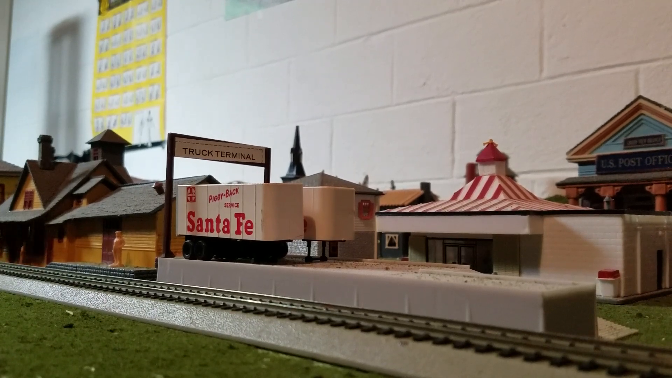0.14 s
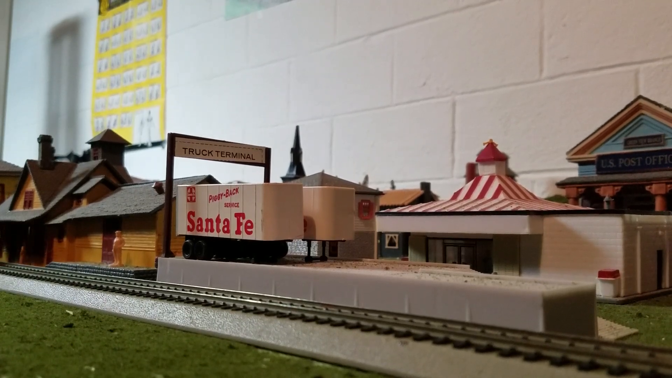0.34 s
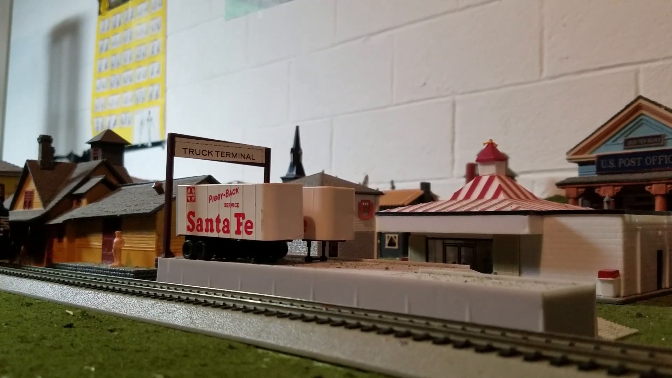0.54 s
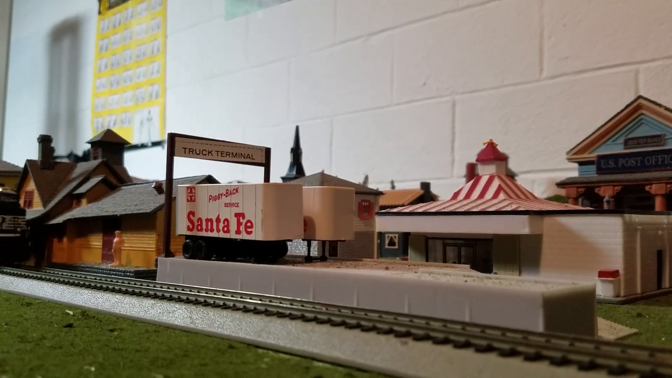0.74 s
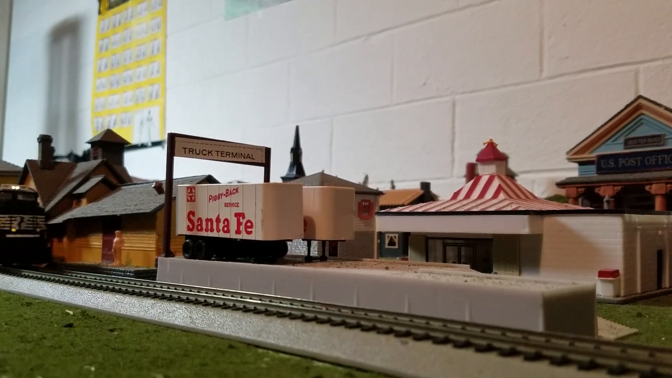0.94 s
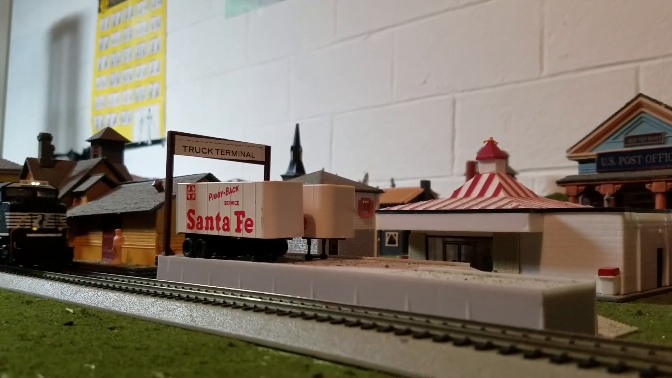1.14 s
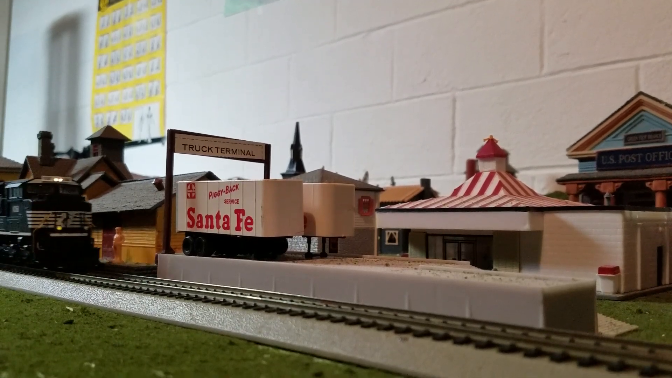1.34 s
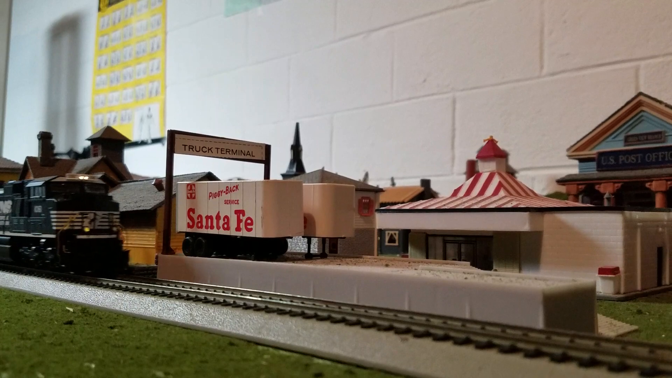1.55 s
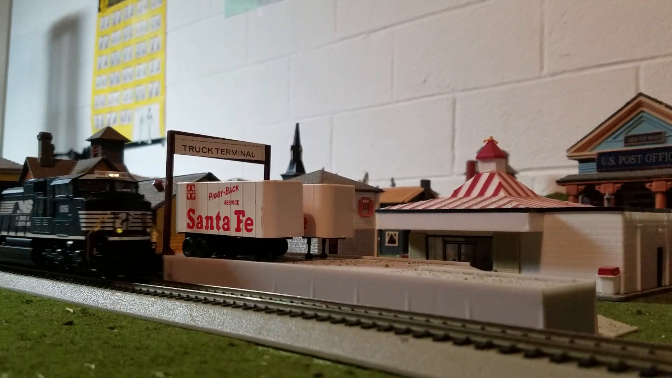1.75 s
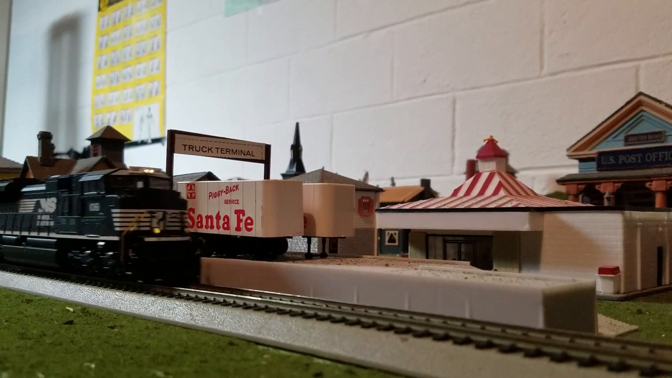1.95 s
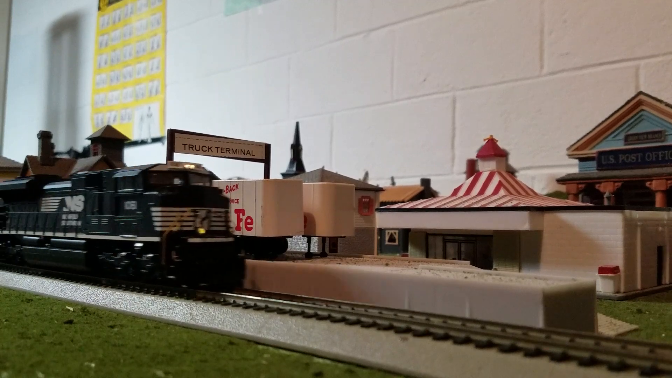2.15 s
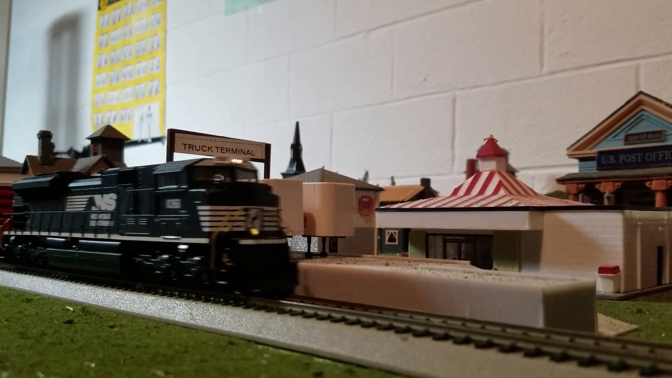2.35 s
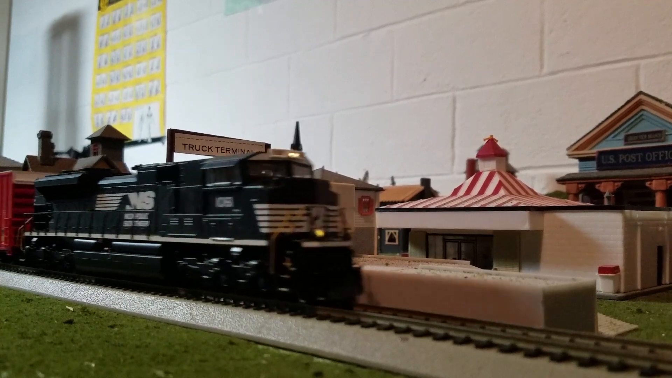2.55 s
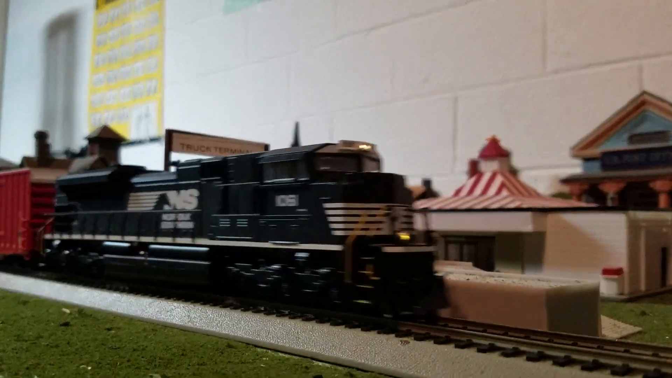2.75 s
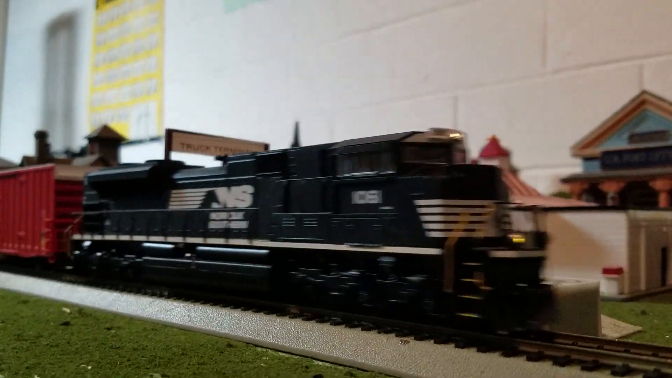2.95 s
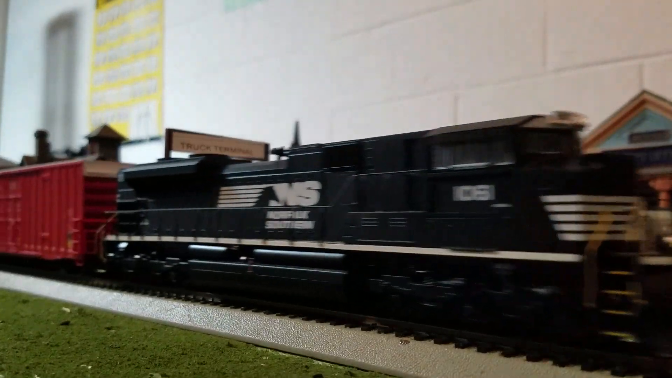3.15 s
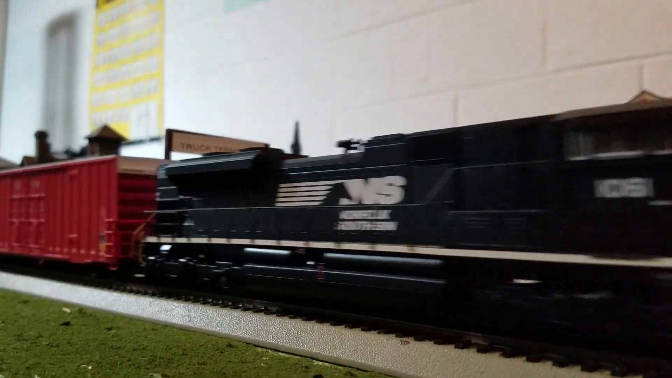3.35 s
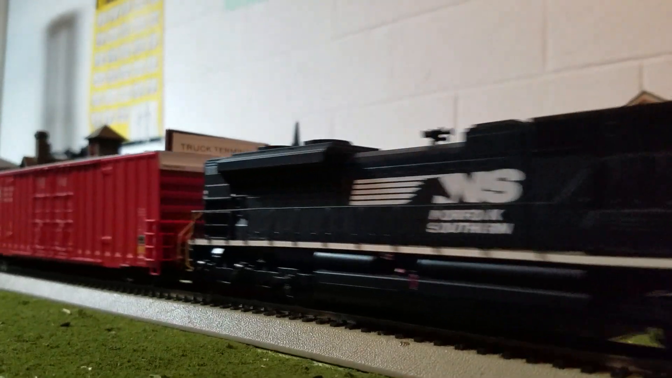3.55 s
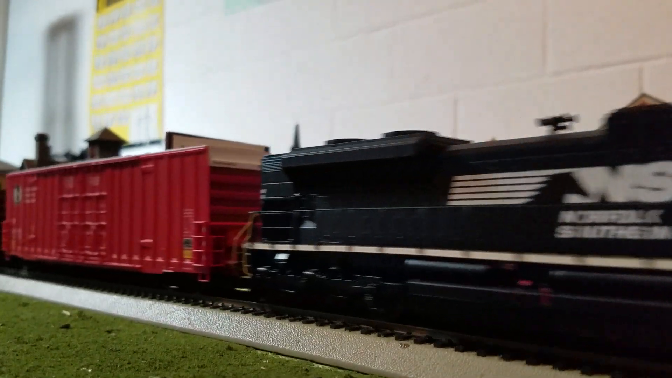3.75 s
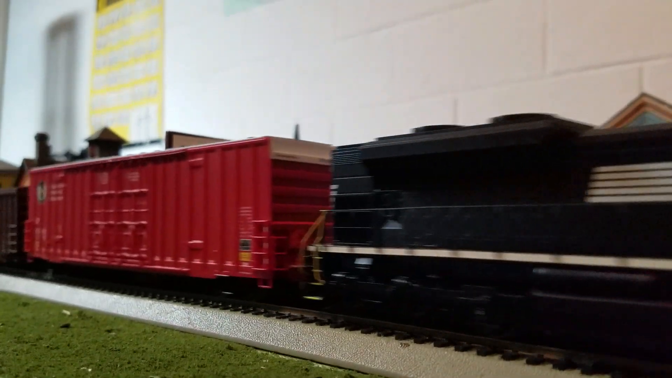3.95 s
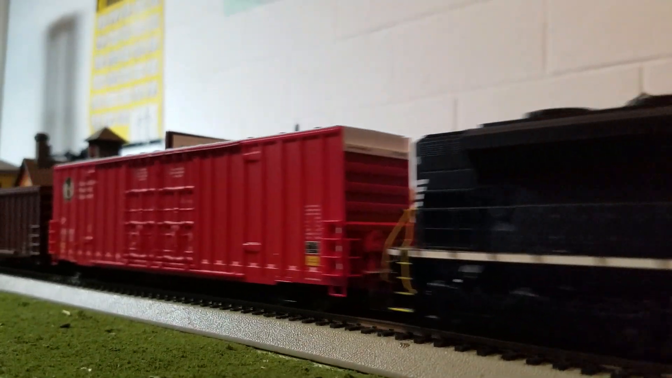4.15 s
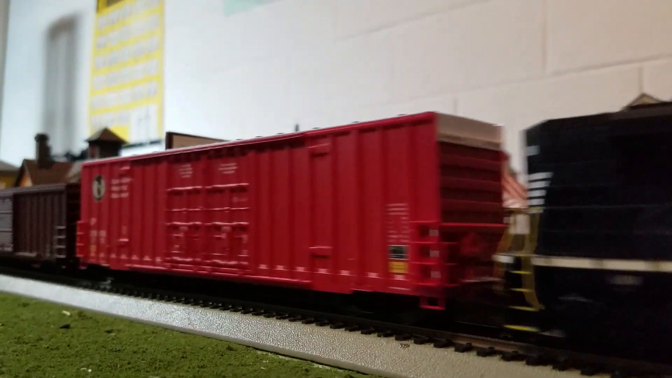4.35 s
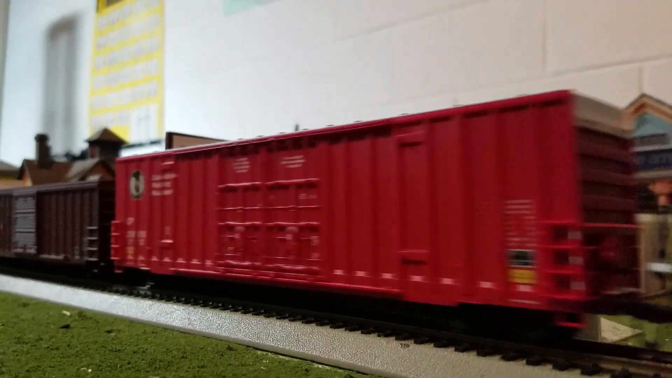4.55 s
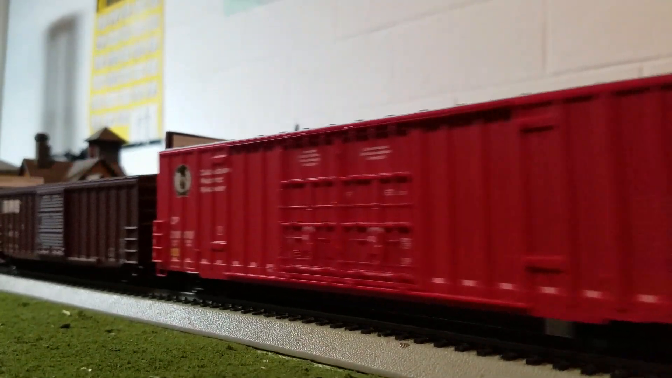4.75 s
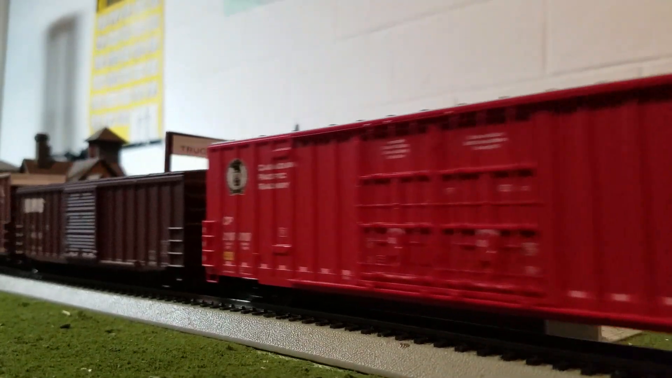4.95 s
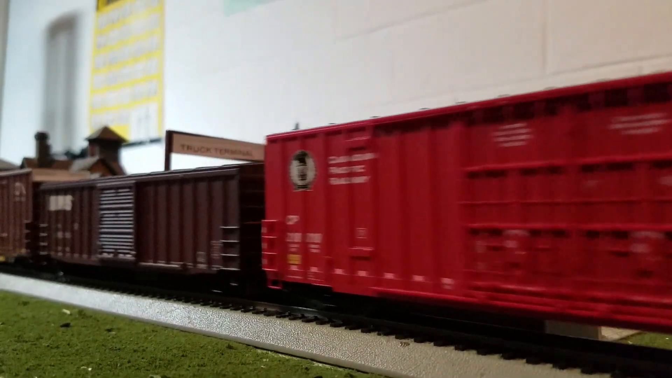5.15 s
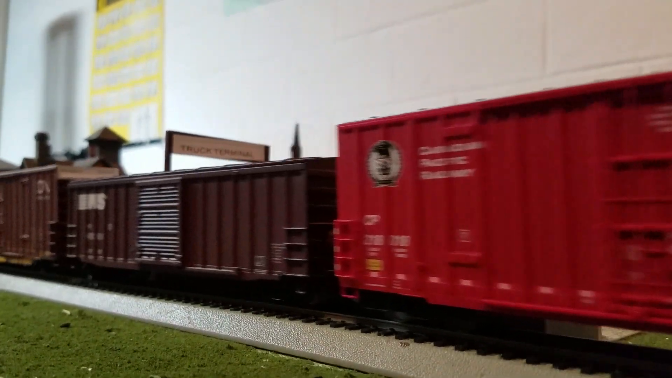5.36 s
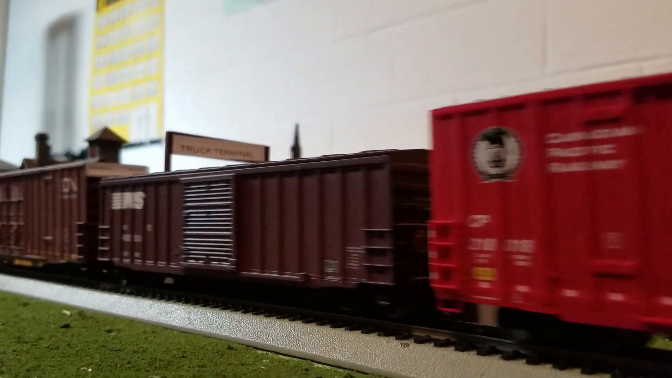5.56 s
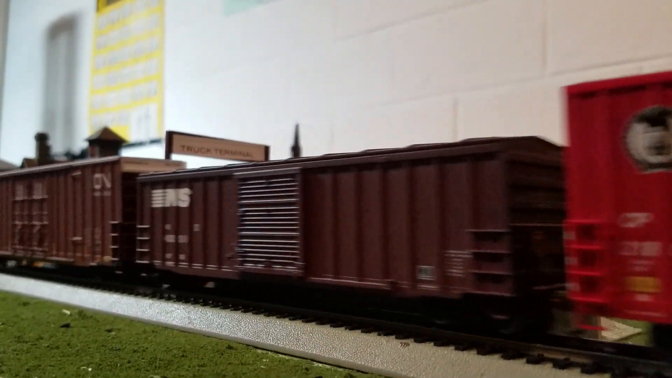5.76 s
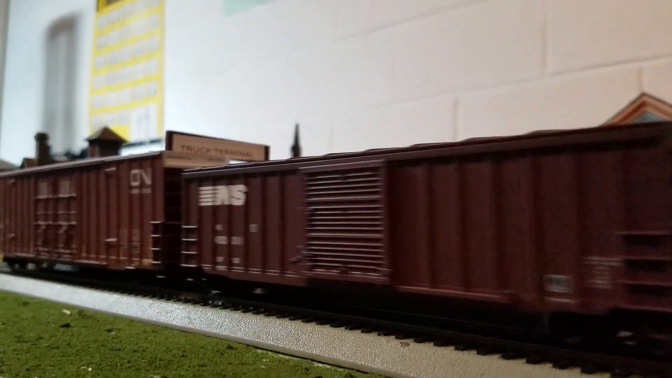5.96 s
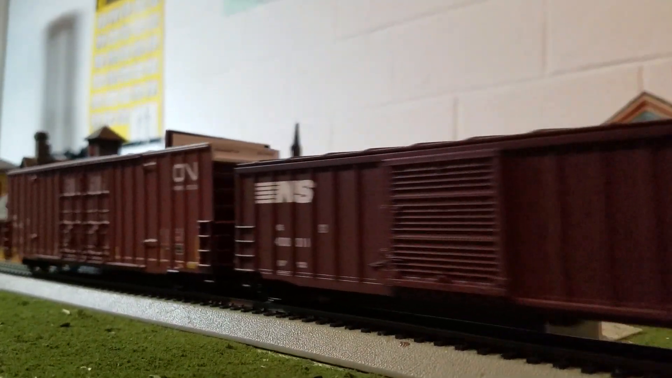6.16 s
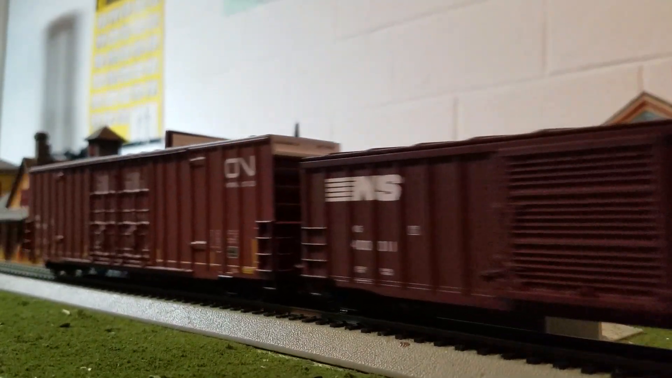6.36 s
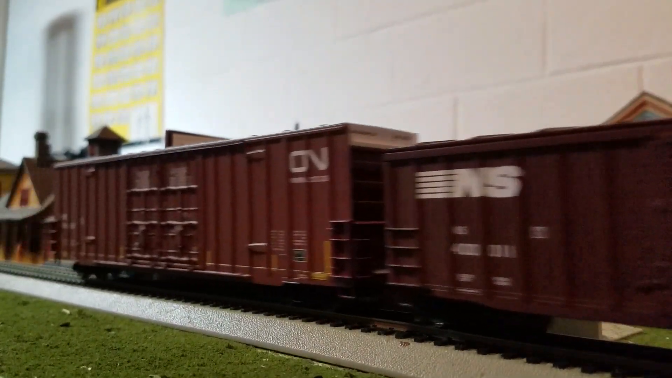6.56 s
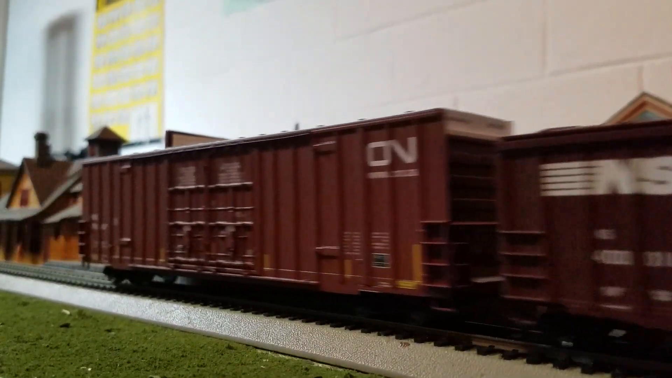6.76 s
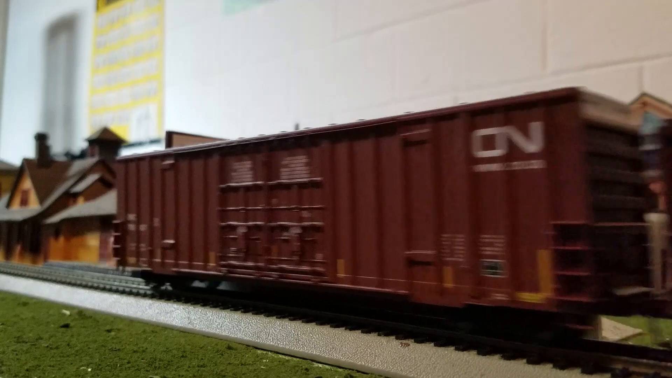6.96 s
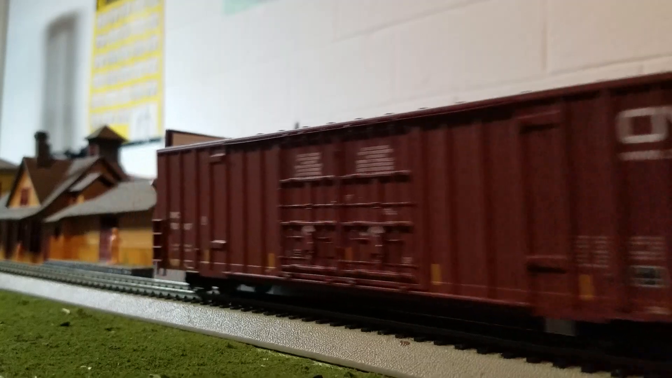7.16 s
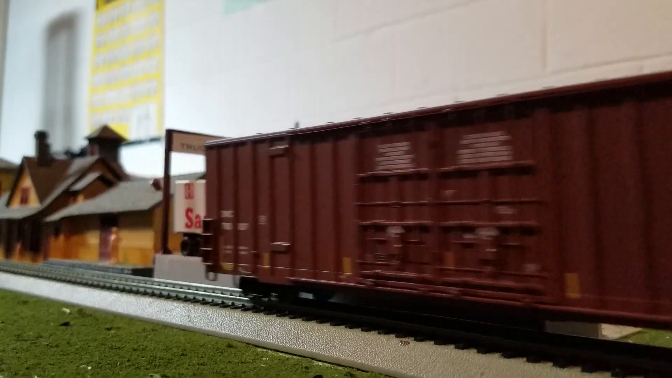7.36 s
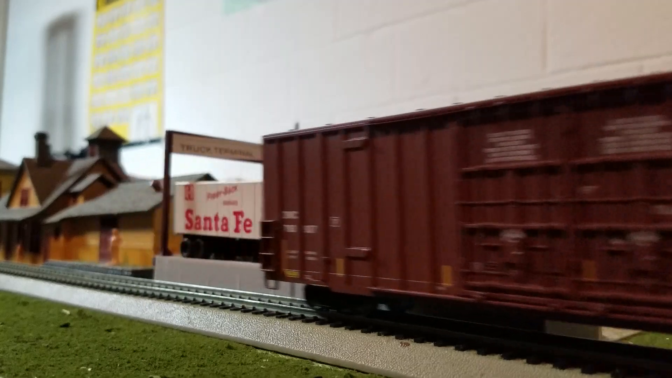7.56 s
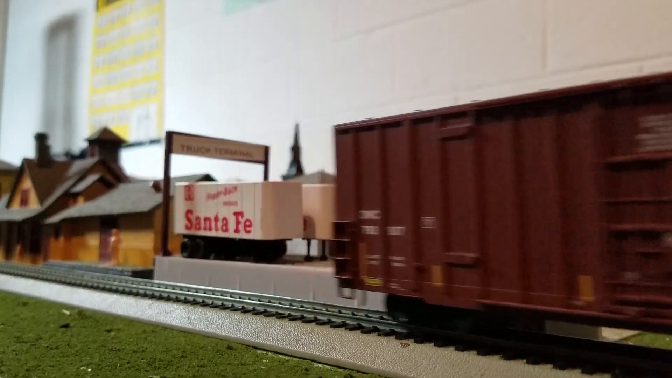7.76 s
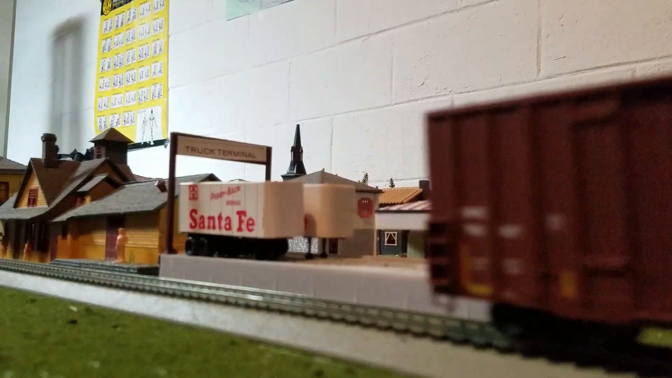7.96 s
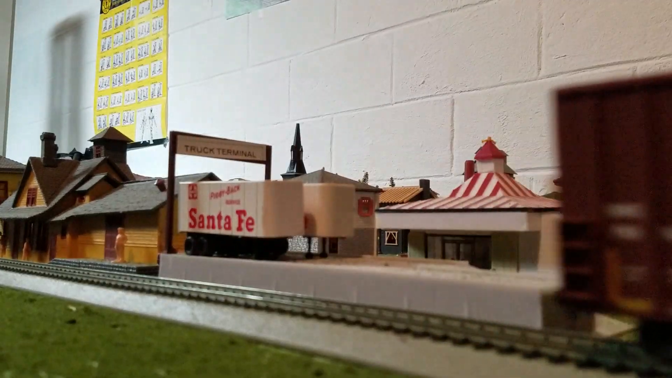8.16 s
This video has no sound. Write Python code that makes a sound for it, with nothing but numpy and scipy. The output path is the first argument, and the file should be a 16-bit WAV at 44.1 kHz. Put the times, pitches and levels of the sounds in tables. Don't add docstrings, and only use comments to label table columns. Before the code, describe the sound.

A small electric model train whines and growls closer, passes right by the microphones with ticking, hissing wheels, then its motor recedes behind rolling cars.

```python
import sys
import numpy as np
from scipy import signal
from scipy.fft import rfft, irfft
from scipy.io import wavfile
from scipy.ndimage import uniform_filter1d

SR = 44100
rng = np.random.default_rng(int(sys.argv[2]) if len(sys.argv) > 2 else 0)


def ratio(d):
    e = np.asarray(d, float) / 20
    return 10 ** e


def wav_record(signal):
    frames = np.transpose(np.atleast_2d(signal))
    bounded = np.clip(frames, -1, 1)
    quanta = np.round(bounded * 32767).astype(np.int16)
    wavfile.write(sys.argv[1], SR, quanta)


N = 362061
FRAME, HOP = 1024, 256
TURN = 3493
WHINE_HZ = 1392.3
BOARD_S = 3.63


def evened(x):
    return x / np.sqrt(np.mean(abs(x) ** 2) + 1e-20)


def wander(count):
    once = uniform_filter1d(rng.standard_normal(N), count)
    return evened(uniform_filter1d(once, count))


def columns(rows, t):
    s, *values = np.transpose(rows)
    return [np.interp(t, s, v) for v in values]


def over_hz(rows, hz):
    return columns([(np.log(r[0]), *r[1:]) for r in rows], np.log(hz + 1))


def swells(rows, t):
    return sum(db * np.exp(-((t - s) / half) ** 2) for s, db, half, *_ in rows)


def resonance(hz, centre, width, order=2):
    return 1 / (1 + (2 * (hz - centre) / width) ** order)


def spectra(x):
    hz, t, z = signal.stft(x, SR, nperseg=FRAME, noverlap=FRAME - HOP)
    return hz[:, None], t, z


def sound(z):
    return signal.istft(z, SR, nperseg=FRAME, noverlap=FRAME - HOP)[1][..., :N]


def banded(z, hz, edges, level_dbs, pan_dbs):
    masks = [((hz >= lo) & (hz < hi)) * 1. for lo, hi in edges]
    masks.append(1 - sum(masks))
    unit = np.mean(abs(z) ** 2) * len(hz) / np.mean(sound(z) ** 2)
    gain = 0
    for mask, level_db, pan_db in zip(masks, level_dbs, pan_dbs):
        rms = np.sqrt((mask * abs(z) ** 2).sum(axis=0).mean() / unit)
        right = 2 * ratio(level_db) / np.sqrt(1 + ratio(2 * pan_db)) / rms
        sides = np.array([right * ratio(pan_db), right])[:, None]
        gain = gain + uniform_filter1d(mask, size=5, axis=0) * sides
    return gain


def patches(shape, bins, frames, depth_db):
    field = rng.standard_normal((2, *shape))
    field = uniform_filter1d(field, bins, axis=1)
    for _ in range(2):
        field = uniform_filter1d(field, frames, axis=2)
    return ratio(depth_db * evened(field))


# time in seconds, nearness in dB,
# delay of the left microphone in samples, left-right difference in dB.
LOCO_PASS = [(0, -47, -11.5, -3), (.3, -45.5, -11, -4.5), (1.4, -46, -10.5, -3), (1.6, -45.5, -9.5, -4),
             (2.3, -42.5, -9.5, -3), (2.8, -40.5, -8, -5.5), (3.15, -38, -6, -5), (3.55, -35.5, -5.5, -5),
             (4.0, -32.5, -1.5, -7), (4.4, -31, 5.5, -10), (4.75, -30, 11.5, -12.5), (5.05, -32, 19, -17),
             (5.5, -34, 25, -16.5), (6.0, -38, 26, -7), (6.3, -35.5, 26.5, -9), (6.8, -44, 24, -4),
             (7.6, -40.5, 23.5, -4.5), (8.21, -40, 24.5, -9.5)]
# centre in seconds, level in dB, half length in seconds.
GROWL_SWELLS = [
    (2.25, 0, 0.52),
    (4.5, 0, 0.21),
    (5.02, 4, 0.09),
    (7.2, -1, 0.56),
]
RING_SWELLS = [(.4, 4, 0.22), (.9, 6.5, 0.18), (1.42, 9.5, 0.22), (1.78, 2, 0.22), (2.87, 8.5, 0.21),
               (3.15, -4.5, 0.11), (3.85, 0.5, 0.099), (4.25, -4, 0.35), (4.58, -5, 0.17), (5.22, 3.5, 0.2),
               (5.7, 1.5, 0.12), (6.2, 2.5, 0.1), (6.75, 6, 0.14), (7.76, 3, 0.11)]
UPPER_SWELLS = [(1.2, 2.5, 0.53), (2.72, 5.5, 0.15), (3.1, 3.5, 0.24), (3.5, -7, 0.25), (3.6, 6.5, 0.23),
                (4.18, 2.5, 0.11), (4.75, 0.2, 0.21), (5.45, 6, 0.23), (6.32, -1, 0.054), (6.95, 4, 0.12),
                (7.4, 11, 0.071), (8.1, 6, .15)]
BUZZ_SWELLS = [
    (3.35, 2.5, 0.31),
    (1.3, 6, 0.94),
    (2.85, 5.5, 0.14),
    (4.02, 2.5, 0.39),
    (4.7, 0, 0.18),
    (5.5, 3.5, 1),
    (6.3, -8, 0.33),
    (7.55, -7, 0.2),
]
# centre in seconds, left-right in dB, half length in seconds.
RING_LEANS = [
    (1.2, -4, 0.63),
    (3.7, 1, .15),
    (4.45, 9.5, 0.39),
]
UPPER_LEANS = [
    (1.9, -6.5, 0.99),
]


def passing_drive(t):
    growl, lag, lean = columns(LOCO_PASS, t)
    behind = .5 + .5 * np.tanh((t - 5.04) / 0.12)
    ring = growl + 5 + swells(RING_SWELLS, t)
    upper = growl + 3.5 - 10 * behind + swells(UPPER_SWELLS, t)
    buzz = growl + 5 + swells(BUZZ_SWELLS, t)
    growl = growl + swells(GROWL_SWELLS, t)
    treble_lean = 1.2 * lean
    leans = lean, treble_lean + swells(RING_LEANS, t), treble_lean + swells(UPPER_LEANS, t), treble_lean
    return (growl, ring, upper, buzz), leans, lag


# frequency in Hz, share of power repeating every shaft turn,
# share repeating every third turn.
SHAFT_REPEATS = [(500, .5, .05), (900, .35, .12), (1500, .3, .12), (2000, .12, .22), (3500, .1, .2),
                 (5000, .05, .05)]
# frequency in Hz, level in dB per Hz.
DRIVE_COLOUR = [(380, -51), (560, -27.5), (680, -13.5), (820, -12), (880, -7.5), (1150, -0.5), (1300, -5.5),
                (1500, -11.5), (1800, -5), (2300, -1), (2800, 3.5), (3200, -2), (4300, -13.5), (5500, -79),
                (9000, -52)]
# frequency in Hz, width in Hz, gain in dB.
SHELL_RESONANCES = [
    (2005, 230, 9),
    (3503, 156, 4),
]


def gear_noise(mesh):
    hz = np.fft.rfftfreq(N, 1 / SR)
    each, third = over_hz(SHAFT_REPEATS, hz)
    shell = 1 + sum((ratio(db) - 1) * resonance(hz, f, width, 4) for f, width, db in SHELL_RESONANCES)
    colour = shell * ratio(over_hz(DRIVE_COLOUR, hz)[0])
    one_turn, three_turns = [rfft(np.resize(rng.standard_normal(TURN * k), N)) for k in (1, 3)]
    fresh = np.sqrt(np.clip(1 - each - third, 0, 1)) * rfft(rng.standard_normal(N))
    mix = np.sqrt(abs(each)) * one_turn + np.sqrt(abs(third)) * three_turns + fresh
    return ratio(-20.5) * evened(mesh * irfft(mix * colour, N))


# frequency in Hz, level in
# dB.
GEAR_TONES = [(605, -58), (643, -56), (682, -54), (706, -55), (744, -55), (870, -50), (934, -50), (971, -48),
              (1009.5, -43.5), (1089, -46), (1110, -46), (1187, -46), (1211, -45),
              (1426, -44.5), (1943, -39), (1993, -35), (2015, -41), (2033, -38), (2116, -42), (2413, -41),
              (2717, -40), (2762, -41), (3050, -43), (3391, -41), (3465, -43), (3987, -48), (4177, -47)]
FAR_TONES = {934: 7, 971: -4, 1009.5: -3, 1089: -2, 1211: 3, 1943: -4, 3391: 3, 4177: 3}


def tooth_levels():
    t = np.arange(N) / SR
    far = np.clip((1.6 - t) / .3 + .5, 0, 1)
    levels = []
    for f, db in GEAR_TONES:
        if abs(f - WHINE_HZ) <= 15:
            continue
        slow = np.interp(t, np.linspace(0, t[-1], 16), rng.standard_normal(16))
        drift_db = 2.5 * slow + far * FAR_TONES.get(f, 0)
        levels.append((f, db + drift_db + 5.0 - 2.0 * (f < WHINE_HZ - 99)))
    return levels


def gear_teeth(levels):
    t, out = np.arange(N) / SR, 0
    for f, level_db in levels:
        slack = wander(count=4000) * f / 11000
        out = out + ratio(level_db) * np.sin(2 * np.pi * (f * t + slack))
    return out


DRIVE_BANDS = [
    (0, 1370),
    (1750, 2230),
    (3200, 23000),
]
MESH = [
    (2, .08),
    (3, .1),
    (5, .08),
    (8, .1),
    (10, .06),
]
# centre in seconds, level in dB, half length in seconds.
RIDGE_FACING = [
    (3.4, 4.8, .3),
    (5.25, 3.2, .3),
    (5.85, 13, 0.26),
    (6.0, 20, 1.6),
]


def drive():
    shaft = np.arange(N) / TURN + .004 * wander(count=8000)
    mesh = 1 + sum(depth * np.cos(2 * np.pi * (k * shaft + rng.random())) for k, depth in MESH)
    levels = tooth_levels()
    versions = [gear_noise(mesh) + gear_teeth(levels) for _ in range(2)]
    hz, t, (direct, walls) = spectra(np.array(versions))
    (growl, ring, upper, buzz), leans, lag = passing_drive(t)
    unevenness = np.interp(t * SR, np.arange(N), wander(count=6000))
    throb = np.cos(2 * np.pi * (t * 2 * SR / TURN + 0.26 * unevenness))
    ring = ring + 2.0 * throb
    ridge = ratio((-13 + swells(RIDGE_FACING, t)) * resonance(hz, 4116, 340))
    late = np.exp(-2j * np.pi * hz * lag / SR)
    same = .95
    pair = np.array([same * late * direct + np.sqrt(1 - same ** 2) * walls, direct])
    gain = banded(direct, hz, DRIVE_BANDS, (growl, ring, upper, buzz), leans)
    standing = patches(direct.shape, bins=5, frames=40, depth_db=1.1)
    return sound(pair * gain * ridge * standing)


# time in seconds, left level in dB, right level in dB,
# phase lead of the left in radians.
WHINE_PASS = [(0, -45, -32, 2.3), (.36, -34, -27, 3.3), (.84, -41, -35, 2.9), (1.27, -33, -33, 2.15),
              (1.9, -32, -31, 4.15), (2.08, -29.5, -29, 4.35), (2.4, -29.5, -32, 4.95),
              (2.8, -31, -38, 4.1), (2.92, -27.5, -32.5, 3.7), (3.15, -25.5, -24.5, 3.25),
              (3.65, -23.5, -20.5, 4.4), (3.95, -21, -21, 2.9), (4.25, -21, -21, 1.15),
              (4.42, -27, -18.5, .9), (4.6, -29.5, -15, .6), (5.25, -28.5, -13.7, -1.05),
              (5.8, -38, -20.5, -.6), (6.2, -35, -18.5, -.7), (6.55, -38, -24.5, -2.2),
              (7.0, -35, -27.5, -1.9), (7.75, -34.5, -30, -2.05), (8.0, -41, -31, -2.4),
              (8.2, -42, -33, -2.7)]
# centre in seconds, level in dB,
# half length in seconds, jump of the left lead in radians.
LEFT_NODES = [
    (.83, -16, .05, 2.05),
    (1.55, -5, .1, 1.3),
    (1.525, -7, .025, 0),
    (5.92, -10, .05, -1.05),
    (6.42, -6, .1, 0),
    (7.26, -11, .11, -1.3),
]
RIGHT_NODES = [
    (.85, -5, .06, 0),
    (1.52, -7, .1, 1.3),
    (1.525, -8, .025, 0),
    (2.52, -3, .05, 0),
    (2.45, -9, .03, -1.05),
    (2.6, -4, .06, 0),
    (3.97, -10, .16, 0),
    (5.93, -5.5, .06, 0),
    (6.68, -11, .11, 1.3),
    (7.45, -14, .07, 1.05),
]


def whine():
    t = np.arange(N) / SR
    left_db, right_db, lead = columns(WHINE_PASS, t)
    for s, _, half, jump in LEFT_NODES + RIGHT_NODES:
        lead = lead + jump * (.5 + .5 * np.tanh(2 * (t - s) / half))
    angle = 2 * np.pi * np.cumsum(WHINE_HZ + 1.5 * wander(count=1500)) / SR
    level_db = np.array([left_db + swells(LEFT_NODES, t), right_db + swells(RIGHT_NODES, t)])
    level_db = level_db + 0.71 * wander(count=1000)
    return np.sqrt(2) * ratio(level_db) * np.sin([angle + lead, angle])


WHEEL_BANDS = [
    (0, 170),
    (170, 600),
    (600, 6500),
]
# frequency in Hz, level in dB per Hz.
WHEEL_COLOUR = [(25, -43), (48, -25.5), (62, -30.5), (370, -17.5), (800, -20.5), (2000, -9), (5400, -16),
                (6550, -20), (7400, -8), (9200, -12), (10600, -37.5), (13000, -44), (14500, -35.5),
                (16000, -44)]
# frequency in Hz, left-right likeness from 0 to 1.
WHEEL_SAME = [(30, .55), (70, .85), (140, .45), (300, .42), (2000, 0.1), (16000, 0.1)]
# frequency in Hz, level in dB.
LEFT_SHADOW = [(1500, 5.5), (3800, 7.5), (5000, -9), (6500, 7), (7600, -10), (9000, 2), (11000, 16),
               (15000, 6.5)]
# time in seconds, rolling level in dB, left-right difference in dB.
CARS = [(0, -51, -6.5), (1.83, -47.5, -2), (3.3, -45.5, 0.5), (3.98, -40, -4), (4.1, -39, -7),
        (4.28, -41.5, -4.5), (4.6, -42, -5), (4.87, -40, -12), (5.28, -36.5, -15.5), (5.43, -40, -10),
        (5.65, -36, -9.5), (6.1, -38, -12.5), (6.4, -36, -14), (6.6, -38, -11), (7.29, -38.5, -13.5),
        (7.77, -40.5, -12.5), (8.21, -41, -8)]
# level in dB at rolling -42 dB, dB gained per dB of rolling.
THUD = (-63, 0.87)
RUMBLE = (-54.5, 0.43)
ROLL = (-39, 1.29)
# centre in seconds, level in dB, half length in seconds.
THUDS = [
    (3.69, 9.5, 0.18),
    (3.97, 11, 0.1),
    (4.165, 11, 0.053),
    (4.397, 6, 0.17),
    (5.455, 9, 0.063),
    (6.3, 0, .1),
    (6.65, 7, 0.17),
    (7.797, 5, 0.24),
]
RUMBLES = [
    (3.2, 0.5, 0.24),
    (4.16, -2, 0.12),
    (4.45, 4, 0.45),
    (5.65, 2.5, 0.13),
    (6.25, 2, 0.23),
    (7.55, 7, 0.054),
    (8.05, 4, 0.25),
]
ROLLS = [
    (4.08, 1, .12),
    (5.002, -1.5, 0.18),
    (5.45, 6, 0.086),
    (6.65, -0.5, 0.55),
    (6.35, -0.5, .12),
    (6.95, 3, 0.055),
    (7.05, -1, 0.13),
    (7.55, -2, 0.042),
]
# centre in seconds, level in dB, half length in seconds.
NOTCHES = [
    (4.85, 4, 0.38),
    (5.42, -14, 0.49),
    (5.9, -1, 0.1),
    (6.55, -7.5, 0.28),
    (7.85, -12, 0.27),
]
# centre in seconds, frequency in Hz, level in dB, half length in seconds.
GLINTS = [
    (3.55, 14300, 8, 0.18),
    (5.0, 14800, 6, .2),
    (5.92, 12100, 3, 0.17),
    (7.55, 11500, 1, .15),
]


def wheels():
    grit = ratio(3.3 * np.minimum(rng.exponential(size=N), 5)) * (rng.random(N) < 300 / SR)
    rough = 1 + 18.0 * signal.lfilter([.015], [1, -.985], grit)
    noise = rng.standard_normal((2, N))
    hz, t, z = spectra(np.array([noise, noise * evened(rough)]))
    z = np.where(hz < 3000, z[0], z[1]) * ratio(over_hz(WHEEL_COLOUR, hz)[0])
    same = np.clip(over_hz(WHEEL_SAME, hz)[0], 0, 1)
    shadow = ratio(over_hz(LEFT_SHADOW, hz)[0] * (hz > 600))
    left = (same * z[1] + np.sqrt(1 - same ** 2) * z[0]) * shadow
    hiss, hiss_pan = columns(CARS, t)
    thud, rumble, roll = [db + share * (hiss + 42) + swells(rows, t)
                          for (db, share), rows in ((THUD, THUDS), (RUMBLE, RUMBLES), (ROLL, ROLLS))]
    off_board = .5 - .5 * np.tanh((t - BOARD_S) / .06)
    levels_db = thud - 7 * off_board, rumble + 0.36, roll + 4.23, hiss
    pans_db = -4.5 + 4 * off_board, -9.5, hiss_pan - 9, hiss_pan
    gain = banded(z[1], hz, WHEEL_BANDS, levels_db, pans_db)
    notch = ratio(swells(NOTCHES, t) * resonance(hz, 6420, 990))
    glint_db = sum(swells([(s, db, half)], t) * resonance(hz, f, 740) for s, f, db, half in GLINTS)
    passing = patches(left.shape, bins=30, frames=50, depth_db=.8)
    standing = patches(left.shape, bins=14, frames=12, depth_db=1.17)
    return sound(np.array([left, z[1]]) * gain * notch * ratio(glint_db) * passing * standing)


def hum():
    t = np.arange(N) / SR
    fading = np.clip((3.5 - t) / 0.67, 0, 1)
    level_db = -59 - 7.5 * np.maximum(t - 1.57, 0) + [[5.5], [-3.0]]
    return ratio(level_db) * fading * np.sin(2 * np.pi * 188.4 * t)


# frequency in Hz, level in dB per bin.
SELF_NOISE = [
    (3000, -95),
    (9000, -70),
    (12000, -82),
    (16000, -83),
]


def self_noise():
    hz, t, z = spectra(rng.standard_normal((2, N)))
    return sound(z * ratio(over_hz(SELF_NOISE, hz)[0] + 20.5)) * ratio([[2.5], [-1.5]])


# first and second axle in seconds, first and second peak in dB.
TRUCKS = [(0.231, 0.3534, -38, -32), (1.476, 1.59, -41, -38), (4.575, 4.69, -27, -30),
          (5.331, 5.4447, -30, -27.5), (5.46, 5.59, -37, -41), (5.81, 5.928, -30, -25),
          (6.248, 6.364, -28, -26), (6.583, 6.691, -21.5, -25.5), (6.9626, 7.075, -30, -29),
          (7.3966, 7.5075, -24, -23.5), (7.7365, 7.8526, -23.5, -23.5), (7.878, 7.992, -31, -29),
          (8.048, 8.171, -31, -32)]
# start in seconds, peak in dB, body minus treble in dB.
SINGLE_WHEELS = [(0.897, -29.5, 1.5), (1.6492, -41, 5), (2.6174, -32, -1), (2.6703, -31.5, 6),
                 (2.8195, -37, 6), (3.092, -16, -8), (3.1213, -20.5, 2), (3.3156, -19, -6),
                 (3.5189, -33, 3), (3.8662, -20.5, 1.5), (3.919, -31, 7), (3.9464, -39, 5),
                 (4.1016, -35, 11), (4.789, -27, 4), (5.057, -32.5, 8), (5.399, -33, 10), (6.5556, -29, 9),
                 (6.731, -42, 5), (6.826, -31, 7), (7.207, -33, 10), (7.278, -35, 12), (7.5817, -35, 9),
                 (7.613, -33.5, 7), (7.9507, -30, 7), (8.1414, -33, 13)]


def blows():
    rows = []
    for first, second, first_db, second_db in TRUCKS:
        for s, db in ((first, first_db), (second, second_db)):
            rows.append((s, db, 7 + 0.54 * min(columns(CARS, s)[0] + 42, 0)))
    out = []
    for s, db, body_db in rows + SINGLE_WHEELS:
        pan_db = 6 + 0.73 * columns(CARS, s)[1]
        lost_db = np.clip(.6 * (-29 - db), -3, 5) * (s > BOARD_S)
        out.append((s, db, pan_db, body_db, lost_db))
    return out


# frequency in Hz, width in Hz, gain in dB.
JOINT_RING = [
    (2030, 1600, 9.5),
    (5560, 810, 4),
    (8340, 1440, 8),
]


def joints():
    size = 2048
    t, hz = np.arange(size) / SR, np.fft.rfftfreq(size, 1 / SR)
    out = np.zeros((2, N + size))
    ring = sum(ratio(db) * resonance(hz, f, width) for f, width, db in JOINT_RING)
    ring = ring / (1 + (700 / (hz + 1)) ** 4)
    bright = 1 / (1 + (9500 / (hz + 1)) ** 8)
    fade = np.minimum(t / .0028, 1) * ratio(-60 * np.maximum(t - .0038, 0) / .014)
    for s, peak_db, pan_db, body_db, lost_db in blows():
        rattle = rfft(rng.standard_normal((2, size)))
        tick = evened(fade * irfft(rattle * bright))
        body = evened(fade * irfft(rattle * ring)) * ratio(min(body_db, 8.5 + lost_db) + 16.0)
        side = ratio([[pan_db / 2 - 12.5], [-pan_db / 2]])
        blow = ratio(-lost_db) * tick + ratio(-lost_db / 2) * body
        start = round(s * SR)
        out[:, start:start + size] += ratio(peak_db - 14.5) * side * np.std(fade) * blow
    return out[:, :N]


def scene():
    return drive() + whine() + wheels() + hum() + self_noise() + joints()


def low_pass(x):
    return signal.sosfilt(signal.butter(12, 15900, fs=SR, output="sos"), x)


def record(dry):
    rounded = np.tanh(dry / 1.3) * 1.3
    rounded = signal.sosfilt(signal.butter(2, 54, "high", fs=SR, output="sos"), rounded)
    lowpass = signal.firwin(511, 15850, window=("kaiser", 9), fs=SR)
    limited = signal.oaconvolve(rounded, lowpass[None], "same")
    return low_pass(limited)


dry = scene()
out = record(dry)
wav_record(out)
```